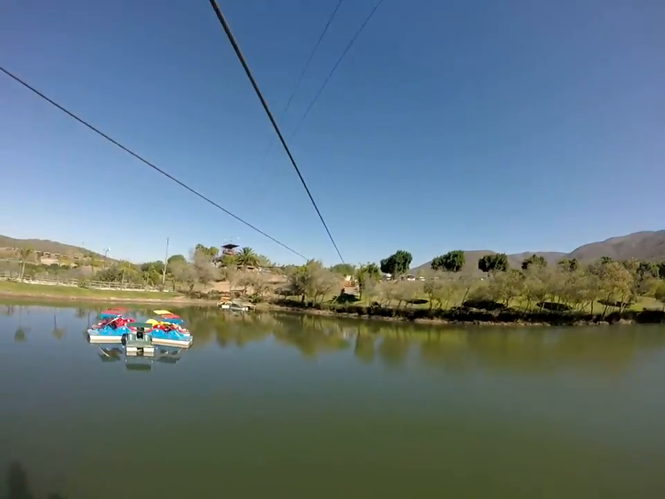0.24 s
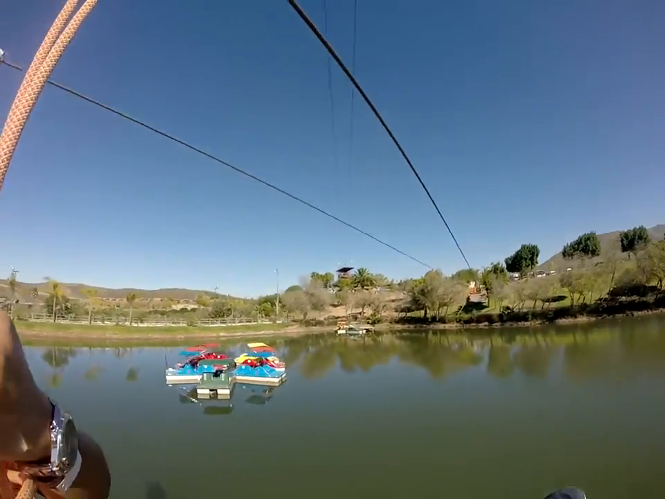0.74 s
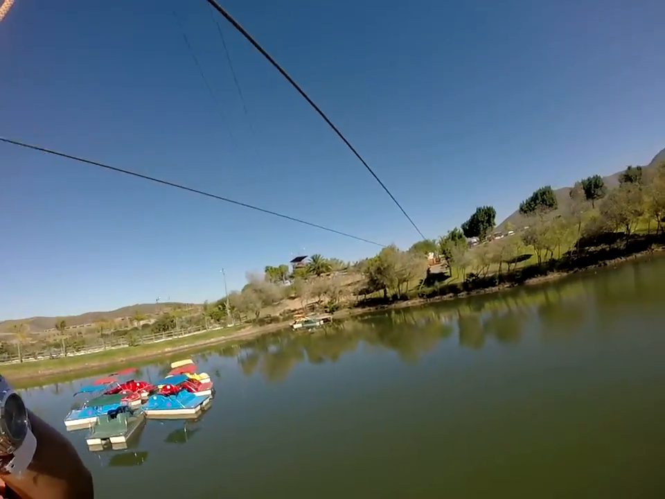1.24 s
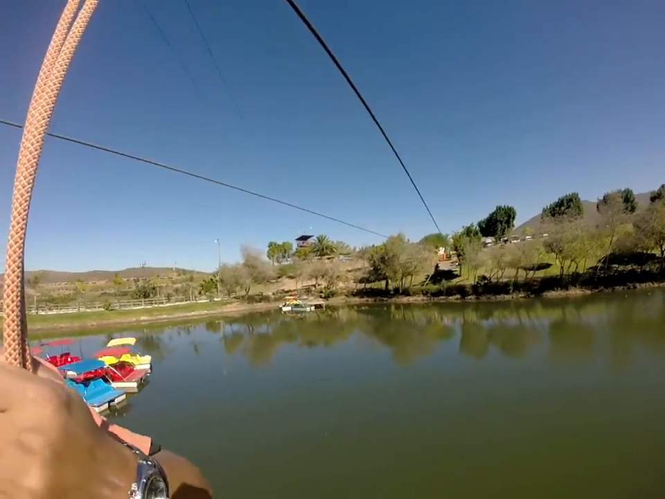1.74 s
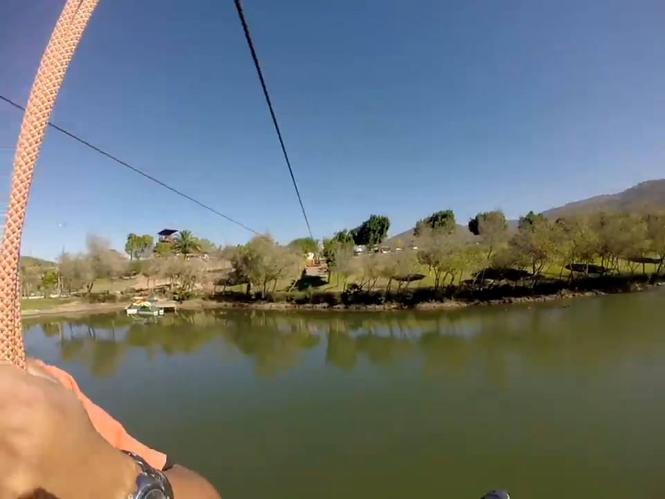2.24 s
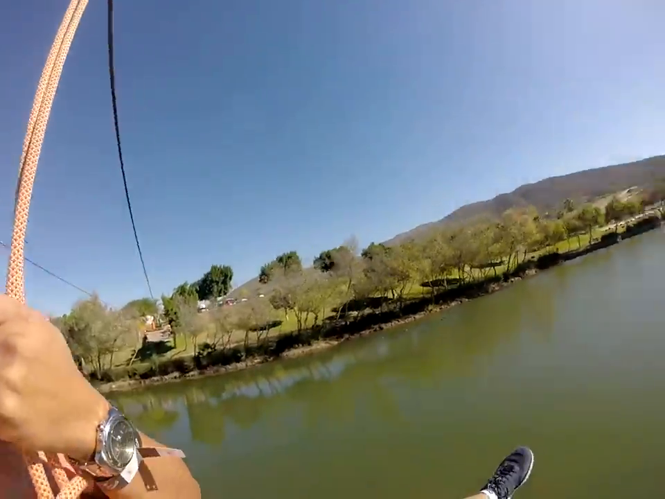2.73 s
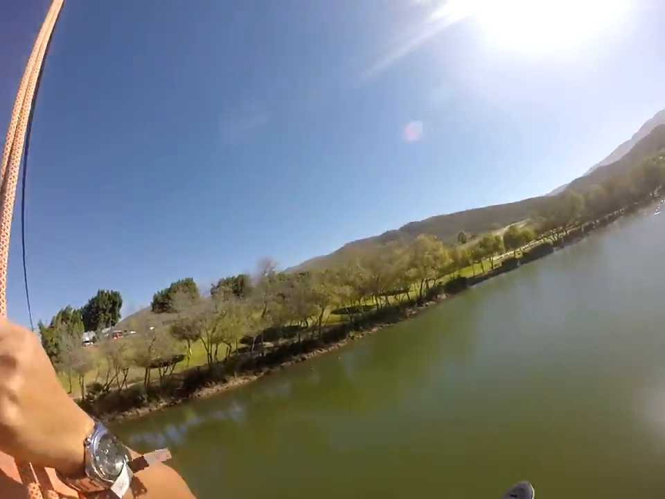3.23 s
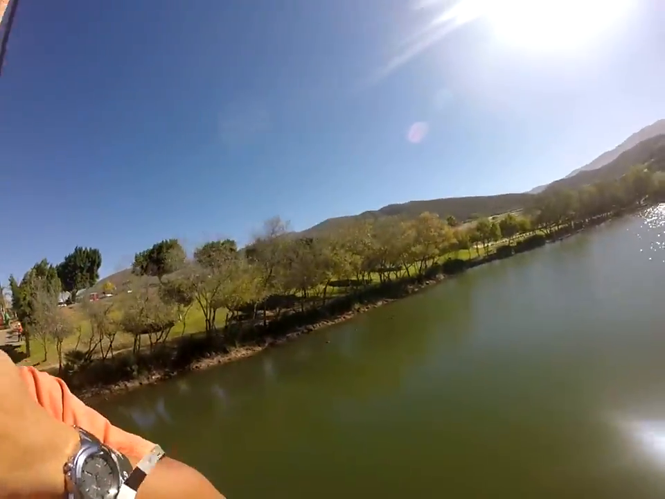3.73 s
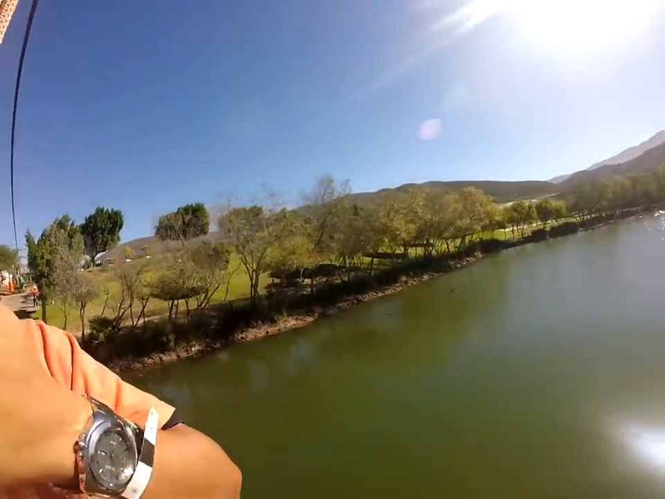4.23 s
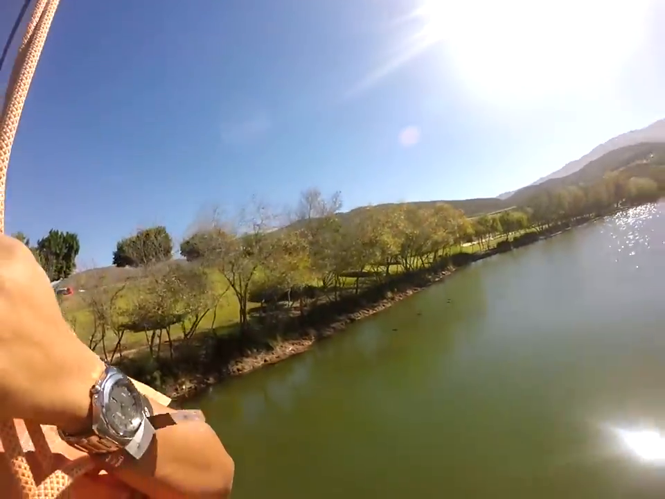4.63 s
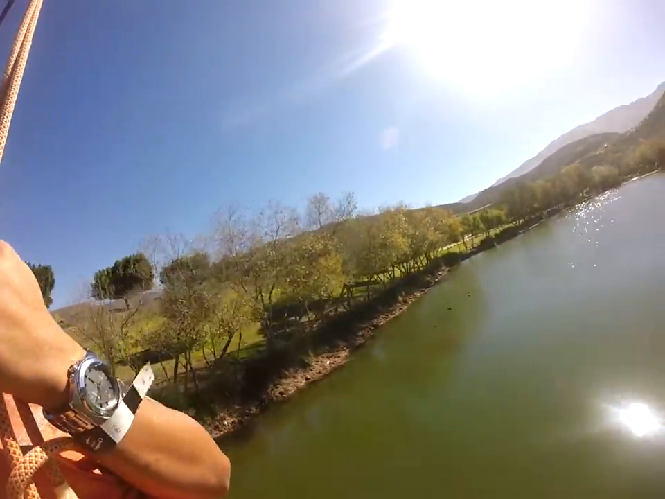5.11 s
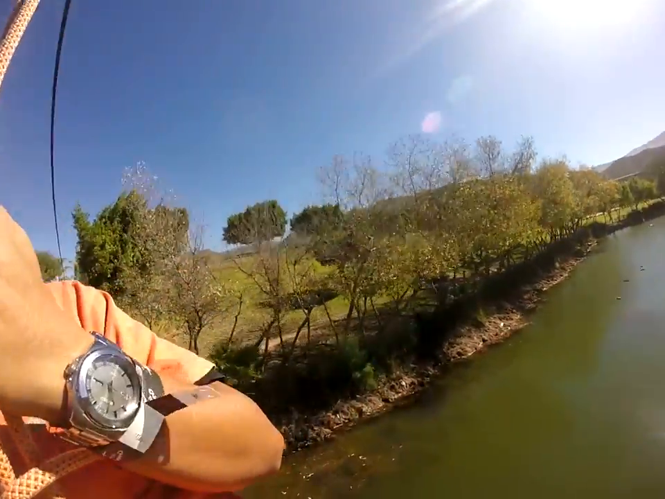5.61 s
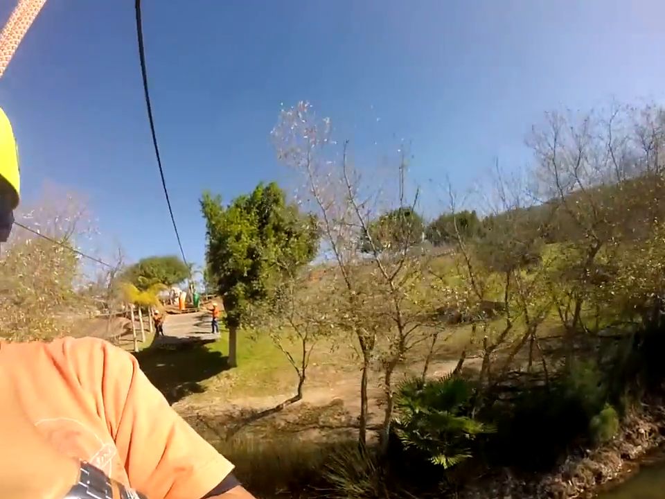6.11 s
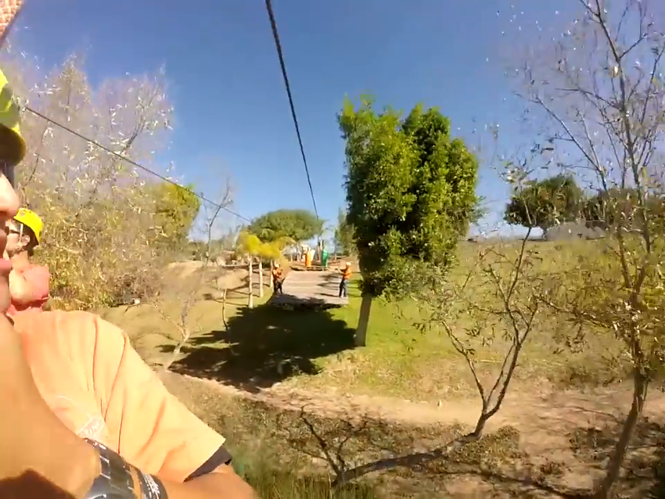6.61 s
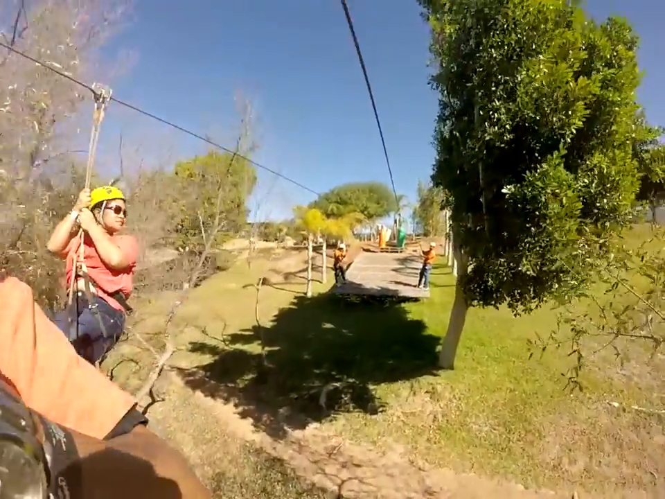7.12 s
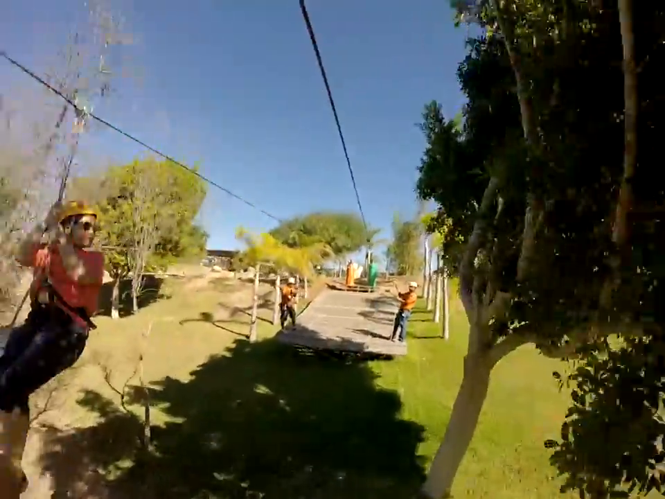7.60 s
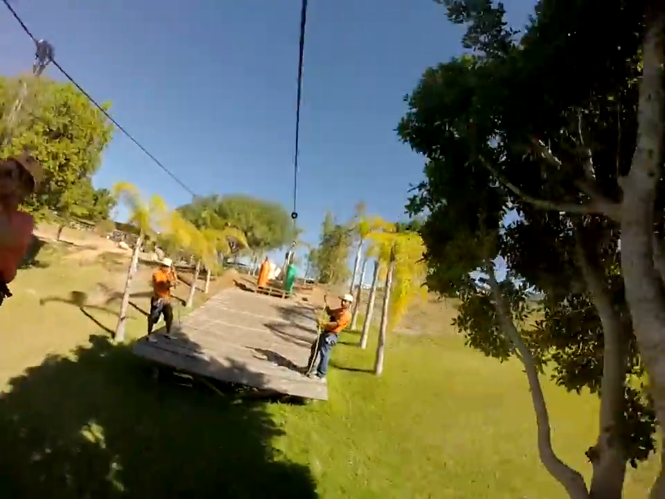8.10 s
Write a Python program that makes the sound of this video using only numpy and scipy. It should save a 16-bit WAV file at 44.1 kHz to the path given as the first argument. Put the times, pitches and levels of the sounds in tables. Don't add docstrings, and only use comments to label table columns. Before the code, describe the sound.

A rider's trolley rolls along a stranded steel cable outdoors, giving a constant bright, whistling hiss with a fainter singing tone sliding slowly down. A second trolley's higher tone fades early. Low wind puffs, strap rubbing and isolated soft thuds with plastic clicks come and go. Near the end bumps cluster. Heard close, from inside a sealed camera case, mono.

```python
import sys
import numpy as np
from scipy import signal
from scipy.fft import rfft, irfft, next_fast_len
from scipy.io import wavfile
from scipy.ndimage import uniform_filter1d

SR = 44100
rng = np.random.default_rng(int(sys.argv[2]) if len(sys.argv) > 2 else 0)


def volts_from_db(level):
    exponent = np.asarray(level, float) / 20
    return 10 ** exponent


def transcribe(signal):
    frames = np.atleast_2d(signal).T
    limited = np.clip(frames, -1, 1)
    pcm = np.round(limited * 32767).astype(np.int16)
    wavfile.write(sys.argv[1], SR, pcm)


N = 368235

# (time [s], rate [Hz])
STRAND_RATE = [(0, 660), (.8, 649.6), (1.5, 640), (2.3, 620), (3.0, 602), (3.8, 577), (4.6, 550.6),
               (5.4, 522), (5.9, 499), (6.4, 470), (6.9, 439.4), (7.3, 425.4), (7.8, 398.5), (8.35, 383)]


def curves(table):
    s, *columns = np.transpose(table)
    return [np.interp(np.arange(N) / SR, s, column) for column in columns]


def bell(s, spread_s):
    return np.exp(-0.5 * ((np.arange(N) / SR - s) / spread_s) ** 2)


def unit(x):
    return x / np.sqrt(np.mean(x ** 2))


def walk(rate):
    hold = int(SR / rate)
    steps = np.repeat(rng.standard_normal(N // hold + 1), hold)
    return 1.2 * uniform_filter1d(uniform_filter1d(steps, hold), hold)[:N]


def noise(gain):
    size = next_fast_len(N)
    hz = np.arange(1, size // 2 + 2) * SR / size
    return irfft(rfft(rng.standard_normal(size)) * gain(hz), size)[:N]


def coloured(spectrum):
    hz, db = np.transpose(spectrum)
    return unit(noise(lambda f: volts_from_db(np.interp(np.log(f), np.log(hz), db, -120, -120))))


def ring(hz, t60, rise_s):
    t = np.arange(int(0.3 * SR)) / SR
    push = (1 - np.exp(-t / rise_s)) ** 2
    return np.sin(2 * np.pi * hz * t) * 1000 ** (-t / t60) * push


def add(out, x, s):
    i = int(s * SR)
    out[i:i + len(x)] += x[:len(out) - i]


def wind():
    # (frequency [Hz], density [dB per Hz])
    rumble_colour = [(20, 9), (40, -5), (70, -3), (100, -7), (140, -25.5), (200, -36), (300, -39)]
    buffet_colour = [(90, 1), (140, -1), (200, -4), (300, -9), (450, -16), (700, -20), (1000, -18)]
    # (time [s], spread [s], rumble [dB], buffeting above rumble [dB])
    gusts = [(0.05, 0.35, -43, -15), (.85, .12, -46, -10), (1.2, 0.22, -40, -12), (1.5, 0.19, -39.5, -3.5),
             (1.8, 0.097, -41, -5), (2.1, 0.17, -46, -3.5), (2.55, 0.17, -43, -11),
             (2.93, 0.19, -39.5, -10), (3.12, 0.19, -42, -20), (3.85, 0.22, -39, -24),
             (4.07, 0.055, -35, -15), (4.27, 0.13, -36, -26), (4.87, 0.17, -38, -11.5),
             (5.2, .15, -40.5, -11), (5.48, 0.21, -39.5, -20), (5.8, 0.14, -45, -14),
             (6.85, 0.16, -43, -13), (7.25, .14, -43, -20), (7.57, 0.083, -35, -14),
             (7.99, 0.046, -33, -17), (8.15, .05, -39, -14), (8.35, .12, -27, -24)]
    rumble, buffet = volts_from_db(-46.5), volts_from_db(-58)
    for s, spread_s, db, buffet_db in gusts:
        gust = volts_from_db(db) * bell(s, spread_s)
        rumble = np.hypot(rumble, gust)
        buffet = np.hypot(buffet, gust * volts_from_db(buffet_db))
    puff = walk(16)
    low = coloured(rumble_colour) * rumble * volts_from_db(2.4 * puff + 5.5)
    return low + coloured(buffet_colour) * buffet * volts_from_db(2.5 * puff + 2.4 * walk(35) + 4.5)


def rubbing():
    # (start [s], hold [s], level [dB])
    strokes = [(.05, .9, -52), (1.15, .9, -46), (2.17, 0.17, -41.5), (2.45, .4, -49), (7.902, 0.065, -42),
               (7.97, .15, -39), (8.134, .008, -34), (8.178, .012, -36), (8.236, .012, -30),
               (8.254, .018, -29), (8.279, 0.02, -34.5), (8.335, .03, -40)]
    # (frequency [Hz], density [dB per Hz])
    rub_colour = [(200, -4), (400, -6.5), (900, -3.5), (1500, -2), (2400, -4), (3200, -24)]
    attack_s, release_s = 0.004, 0.01
    t = np.arange(N) / SR
    level = np.zeros(N)
    for s, hold_s, db in strokes:
        attack = np.clip(1 + (t - s) / attack_s, 0, 1)
        level += volts_from_db(db) * attack * np.exp(-np.maximum(t - s - hold_s, 0) / release_s)
    return coloured(rub_colour) * level * volts_from_db(3.4 * walk(160))


def thuds():
    # (time [s], peak level [dB], frequency [Hz], direction [sign])
    bumps = [(0.178, -22, 85.5, 1), (0.462, -12, 99, 1), (0.479, -13, 91, 1), (0.973, -19.5, 107.5, 1),
             (1.069, -22.5, 118, 1), (1.115, -22, 85, 1), (1.781, -21.5, 101, 1), (5.317, -11.5, 79, 1),
             (6.047, -3.5, 109, -1), (7.306, -7, 105, 1), (7.322, -14.5, 65, 1), (7.352, -15, 89.5, -1),
             (7.378, -13, 106, 1), (7.481, -18.5, 84.5, 1), (7.52, -10, 102, 1), (7.539, -14, 86, 1),
             (7.955, -8.5, 105, -1), (7.978, -12, 59.7, 1), (7.998, -9, 115, -1), (8.063, -5, 115, -1),
             (8.111, -17, 71, 1), (8.174, -5.5, 105, -1), (8.190, -17.5, 82.5, -1), (8.233, -9, 110, -1),
             (8.251, -8, 83.4, -1), (8.337, -10.5, 90, -1)]
    out, push_s = np.zeros(N), 0.0045
    for s, db, hz, direction in bumps:
        t60 = 7.6 / hz * volts_from_db(-0.27 * (db + 12.5))
        swing = ring(hz, t60, push_s)
        swing += volts_from_db(-5.5) * ring(0.7 * hz, 1.17 * t60, push_s)
        swing += volts_from_db(-31) * ring(2.0 * hz, 0.18 * t60, 0.0022)
        add(out, np.sign(direction) * volts_from_db(db) * swing / np.abs(swing).max(), s)
    return out


def knocks():
    # (time [s], peak level [dB], strongest frequency [Hz], high shell mode level [dB])
    clicks = [(0.183, -23.5, 864, -8), (0.452, -16.5, 748, -2), (0.504, -34, 816, -6),
              (0.972, -16, 710, -12), (1.072, -20.5, 727, -2), (1.779, -22, 755, -1),
              (5.314, -7.5, 940, -7), (6.051, -10, 600, -10), (6.158, -28.5, 738, -12),
              (7.315, -29, 401, -13), (7.371, -11, 694, 2), (7.478, -22, 405, -16),
              (7.501, -24.5, 662, -12), (7.52, -14.5, 624, -24), (7.563, -24.5, 1220, -9),
              (7.591, -23, 654, -2), (7.634, -24.5, 1200, -4), (7.655, -21.5, 794, 3),
              (7.689, -23, 1290, -5), (7.909, -21.5, 950, -8), (7.946, -19, 800, 1), (8.132, -22, 773, -4),
              (8.21, -21, 400, -5), (8.228, -16, 904, -3), (8.244, -17, 969, -11), (8.257, -23, 930, -8),
              (8.277, -30, 1380, -6)]
    # (frequency [Hz], level [dB])
    shell_modes = [(370, -6.5), (520, -3), (640, -8), (750, 3.5), (880, 3.5), (1010, 4), (1180, 7),
                   (1330, 5.5), (1480, -1), (1630, -2.5)]
    high_modes_hz = [2290, 2500]
    out = np.zeros(N)
    for s, db, centre_hz, high_db in clicks:
        t60 = 0.032 * volts_from_db(-0.27 * (db + 20))
        hit = 0
        for hz, mode_db in shell_modes:
            scatter_db = 1.5 * rng.standard_normal()
            level_db = mode_db - 10 * abs(np.log2(hz / centre_hz)) + scatter_db
            mode_t60 = t60 * (700 / hz) ** 0.82
            hit = hit + volts_from_db(level_db) * ring(hz * (1 + 0.028 * scatter_db), mode_t60, 0.00043)
        crack = sum(ring(hz, 0.5 * t60, 0.00034) for hz in high_modes_hz)
        click = hit / np.abs(hit).max() + volts_from_db(1.6 * high_db) * crack / np.abs(crack).max()
        add(out, volts_from_db(db) * click, s + 0.0015)
    return out


def strands(hz, multiples_db, wobble_hz, flutter_db):
    phase = 2 * np.pi * np.cumsum(hz + wobble_hz * (walk(9) + 1.297 * walk(90))) / SR
    tone = np.zeros(N)
    for k, db in enumerate(multiples_db, 1):
        tone += np.sqrt(2) * np.sin(k * phase) * volts_from_db(db + flutter_db * walk(45))
    return tone


def other_cable():
    # (time [s], rate [Hz], level [dB])
    neighbour = [(0, 902, -42), (.21, 889, -43), (.49, 832, -44), (.6, 810, -47), (.75, 800, -47),
                 (.93, 760, -50), (1.05, 740, -49), (1.3, 719, -83)]
    hz, level_db = curves(neighbour)
    octave_db = -14 + 18 * np.exp(-np.arange(N) / SR / 0.2)
    return strands(hz, [level_db, level_db + octave_db], wobble_hz=5.7, flutter_db=0.0)


def own_cable():
    # (frequency [Hz], level [dB])
    case_response = [(430, -59), (530, -55), (645, -53.5), (860, -58), (1030, -51.5), (1380, -44),
                     (1600, -49.5), (1980, -40.5)]
    multiples_db = [0, -1.5, -0.1, -19]
    # (time [s], spread [s], change [dB])
    reseats = [
        [(.1, 0.31, -22), (6.4, 0.37, -11), (8.35, 0.29, -14)],
        [(6.55, 0.26, -12), (4.5, 0.23, -5)],
        [(6, 0.2, -10), (1.4, .3, 1), (7.5, .3, -3.5)],
        [(3.7, 0.46, 16), (5.35, .35, 17), (7.05, .4, 23), (8.3, .4, 19)],
    ]
    hz, = curves(STRAND_RATE)
    case_hz, case_db = np.transpose(case_response)
    levels_db = []
    for k, (db, changes) in enumerate(zip(multiples_db, reseats), 1):
        level_db = db + np.interp(np.log(k * hz), np.log(case_hz), case_db)
        for s, spread_s, change_db in changes:
            level_db = level_db + change_db * bell(s, spread_s)
        levels_db.append(level_db)
    return strands(hz, levels_db, wobble_hz=3.6, flutter_db=2.2)


def resonance(f, hz, width):
    # (frequency [Hz], width [Hz])
    dead_spots = [(2380, 190), (4315, 190)]
    gain = 1 / (1 + ((f / hz - hz / f) * hz / width) ** 2)
    for dead_hz, dead_width in dead_spots:
        gain = gain * (1 - 0.53 / (1 + (2 * (f - dead_hz) / dead_width) ** 2))
    return gain


def wheels():
    # (time [s], load [dB])
    roll = [(0, -14.5), (.18, -12), (.37, -14), (.51, -12), (.67, -15.5), (.86, -12.5), (.95, -14.5),
            (2.04, -13.5), (3.23, -15.5), (3.65, -12.5), (5.14, -17.5), (5.2, -15), (5.51, -15.5),
            (5.79, -13), (6.3, -17), (6.98, -12.5), (7.77, -14.5), (7.93, -13.5)]
    # (time [s], level of the finest hiss [dB])
    sheen = [(0, -0.5), (1.37, 2.5), (2.4, -1.5), (3.45, 3), (3.97, -0.4), (4.6, 1.5), (5.2, 3),
             (5.85, 2.5), (6.05, -2.5), (6.45, -4), (6.63, -0.5), (6.81, 3.5), (7.32, -2), (7.88, 0),
             (8.02, 3), (8.35, 3.5)]
    # (time [s], pose [0 down the line, 1-2 aside, 3 landing])
    camera_pose = [(0, -1), (1.9, 0), (2.4, 0.6), (2.9, 1.1), (3.8, 1), (4.2, 2), (5.85, 2), (6.05, 0.7),
                   (6.62, .8), (6.7, 3), (8.35, 6.5)]
    # (frequency [Hz], width [Hz], level in pose 0, 1, 2, 3 [dB])
    hiss_modes = [(620, 810, -40, -44, -49.5, -42.5), (1155, 680, -39, -39, -39.5, -42),
                  (1397, 290, -33, -31.5, -35, -30.5), (1844, 240, -29, -28.5, -32, -29),
                  (2010, 150, -29, -28, -31, -35), (2430, 360, -36, -30.5, -27, -37),
                  (2612, 177, -12.5, -27, -23, -22), (2867, 570, -19, -17.5, -18, -19),
                  (3277, 365, -8.5, -9.5, -9.5, -9), (3418, 116, -6, -2, -7.5, -5),
                  (3545, 140, 1.5, 2, -0.6, 2.2), (3763, 76, -8.5, -9, -7.5, -11),
                  (3995, 257, -10.5, -11.5, -11.5, -16), (4140, 140, -17.5, -19, -14.5, -19.5),
                  (4500, 240, -17.5, -19, -17, -20.5), (4900, 860, -16, -20, -21.5, -23),
                  (5630, 400, -23, -19, -23, -27), (6036, 200, -15, -18, -16, -19.5),
                  (6420, 480, -17.5, -13.5, -15, -28.5), (7058, 294, -17.5, -25, -25, -20),
                  (7580, 540, -32, -28.5, -30, -28),
                  (8270, 460, -25, -30, -30, -36), (8920, 210, -36, -39, -39, -42),
                (9600, 940, -31.5, -31, -36, -35), (10600, 300, -33, -36, -30.5, -44),
                (11340, 830, -41.5, -39, -42, -47.5), (12350, 390, -41, -43, -33.5, -47),
                (12900, 700, -48, -47, -51, -44), (13500, 1000, -41.5, -49, -46, -52),
                (14700, 1100, -58, -51, -52, -57)]
    group_edges_hz = [2400, 4300, 7800]
    main_db, = curves(roll)
    clear_db, = curves(sheen)
    pose, = curves(camera_pose)
    strand_hz, = curves(STRAND_RATE)
    speed_db = 20 * np.log10(strand_hz / strand_hz[0])
    upper_db = speed_db + 0.32 * clear_db
    groups, shake = np.zeros((4, N)), walk(40)
    for hz, width, *pose_db in hiss_modes:
        band = noise(lambda f: resonance(f, hz, width))
        wander_db = 1.1 * walk(0.8) + 0.67 * walk(12) + 0.6 * shake
        db = np.interp(pose, np.arange(len(pose_db)), pose_db) + wander_db
        groups[np.searchsorted(group_edges_hz, hz)] += band * volts_from_db(db)
    groups /= np.sqrt(uniform_filter1d(groups ** 2, SR // 2, axis=1))
    levels_db = np.array([-40 + upper_db, main_db, -23 + upper_db, -36 + speed_db + clear_db])
    return np.sum(groups * volts_from_db(levels_db), axis=0)


def gain_control():
    # (time [s], gain change [dB])
    ducks = [
        (.3, -4),
        (2.31, -2),
        (6.06, -2),
        (7.969, -5.5),
    ]
    attack_s, recover_s = 0.005, 0.7
    gain_db = np.zeros(N)
    for s, db in ducks:
        since = np.maximum(np.arange(N) / SR - s, 0)
        gain_db += db * (1 - np.exp(-since / attack_s)) * np.exp(-since / recover_s)
    return volts_from_db(gain_db)


def scene():
    background = wind() + rubbing() + thuds() + knocks()
    return np.tile(background + other_cable() + own_cable() + wheels(), (2, 1))


def band_limit(x):
    return signal.sosfilt(signal.butter(12, 15190, fs=SR, output="sos"), x)


def record(dry):
    mix = np.tanh(0.59 * gain_control() * dry) / 0.6
    return band_limit(mix)


dry = scene()
out = record(dry)
transcribe(out)
```